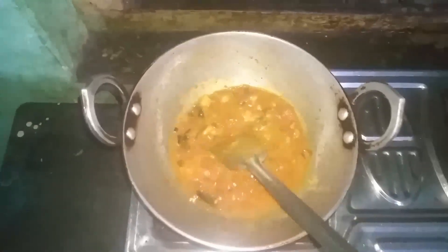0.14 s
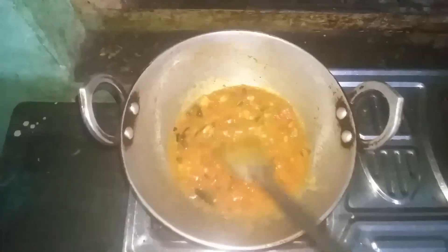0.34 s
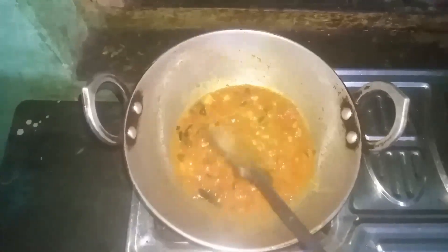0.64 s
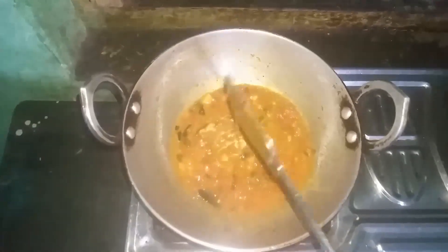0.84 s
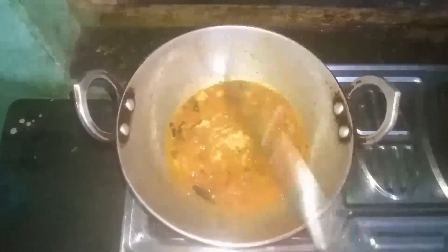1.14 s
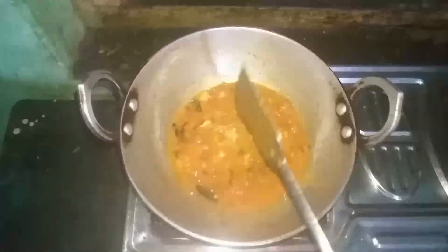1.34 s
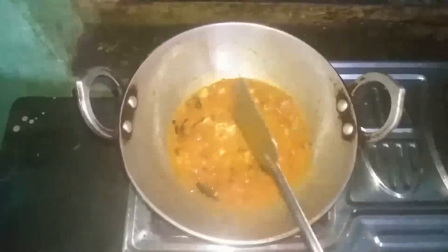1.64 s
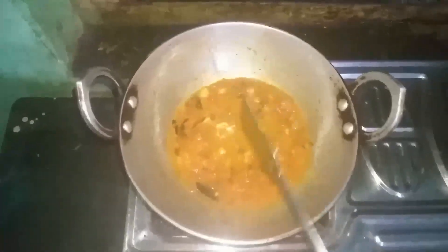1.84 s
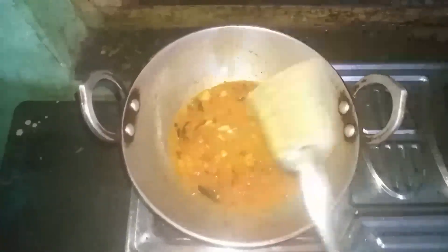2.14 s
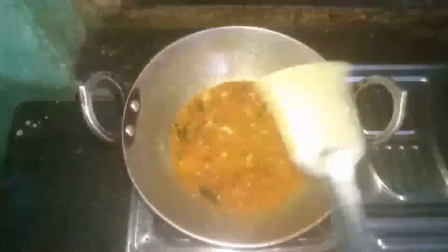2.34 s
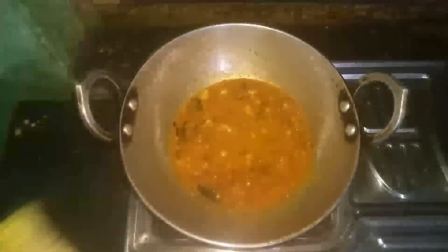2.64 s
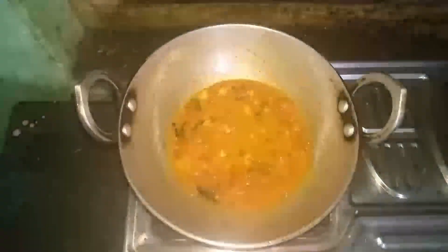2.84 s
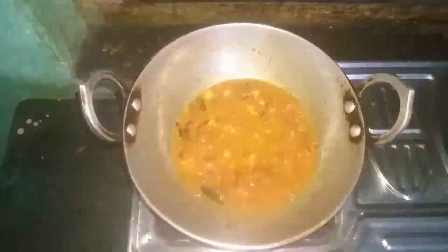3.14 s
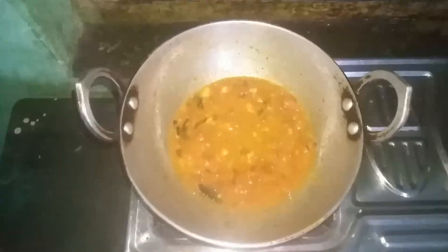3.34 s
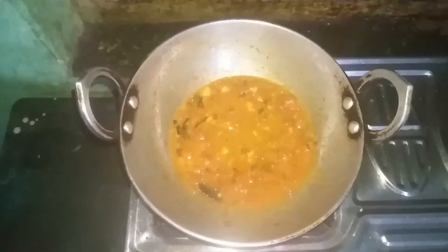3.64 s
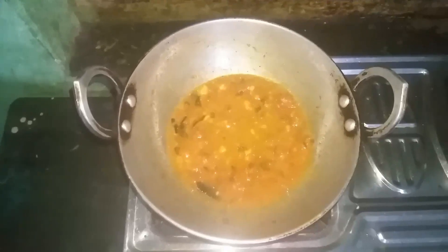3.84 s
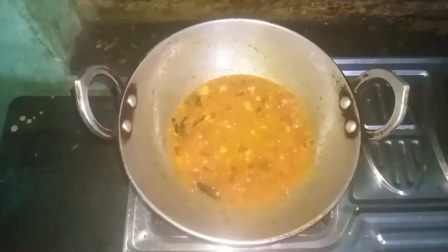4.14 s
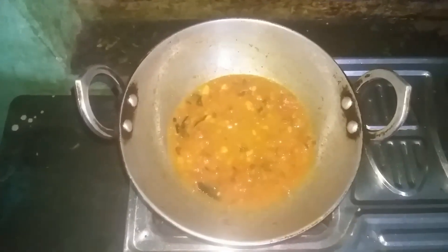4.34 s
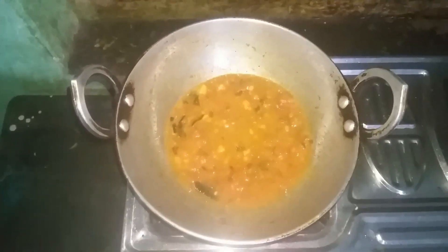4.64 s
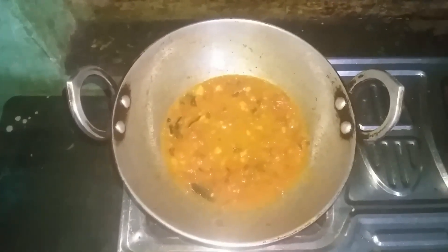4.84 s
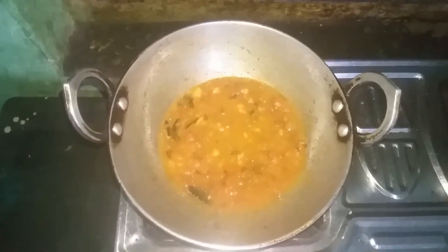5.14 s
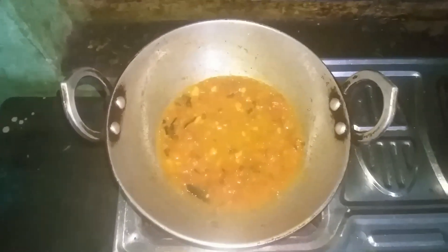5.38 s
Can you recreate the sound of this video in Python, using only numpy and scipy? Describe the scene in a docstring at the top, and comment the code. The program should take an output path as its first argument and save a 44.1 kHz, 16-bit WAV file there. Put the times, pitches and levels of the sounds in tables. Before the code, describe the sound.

Gravy sizzles and pops in a hot pan over a fan's hum, and a metal spatula is set down with a ringing clank.

```python
"""In a hard-walled kitchen, gravy simmers in a hot metal pan over the hum of a fan motor.
Tiny bubbles burst at the rim, each a damped resonator; together they sizzle, with bigger pops and spits.
At first a spatula scrapes the pan, its slips exciting the metal. Near the end it is put down on steel:
a touch, a loud clank, a short clatter and a ring, after which a gain control lowers the level a little.
Faint far-off squeaks and a soft rush come and go behind."""
import sys
import numpy as np
from scipy import signal
from scipy.fft import rfft, irfft, next_fast_len
from scipy.io import wavfile
from scipy.ndimage import uniform_filter1d, map_coordinates

SR = 44100
rng = np.random.default_rng(int(sys.argv[2]) if len(sys.argv) > 2 else 0)


def int16_out(signal):
    """Quantize to a 16-bit WAV file."""
    q = np.round(np.clip(np.atleast_2d(signal).T, -1, 1) * 32767)
    wavfile.write(sys.argv[1], SR, q.astype(np.int16))


N = 242991
TIME = np.arange(N) / SR

# Spectral shapes. Each row: frequency in Hz, relative gain in dB.
SIZZLE_SPECTRUM = [(600, -44), (1100, -39), (1400, -25.5), (1600, -13.5), (2000, -11.5), (2500, -5.5),
                   (3050, -0.5), (3350, -4.5), (3800, -1), (4900, -5.5), (6500, -9), (7900, -7.5),
                   (8900, -14), (10000, -34.5), (15500, -35.5)]   # bursting bubbles
SPRAY_SPECTRUM = [(7000, -26), (9500, -4), (11800, -1.5), (13500, -8), (15500, -8)]   # fine spray of steam
CLASH_SPECTRUM = [(60, -59), (130, -31), (340, -24), (480, -31), (1400, -28.5), (1850, -19), (2130, -12.5),
                  (2450, 4), (2800, -9), (3100, 1), (3500, -7), (4600, -5), (5650, -14.5), (7400, -8.5),
                  (8400, -13.5), (9800, -21.5), (15500, -14)]   # dense modes of thin steel
RUSH_SPECTRUM = [(300, -18), (600, -18.5), (720, -4), (880, 1), (1050, -0.5), (1300, -4.5), (1600, -1),
                 (2400, -42)]   # soft midrange rush
FAN_AIR_SPECTRUM = [(20, -17), (40, -10), (55, -2), (75, -11), (110, 2), (140, 0), (190, 0), (260, -1),
                    (335, 0.5), (390, -13), (600, -18), (1400, -26.5), (6000, -48)]   # air moved by the fan
PORT_DIFFERENCE = [(50, -22), (110, -44), (200, -57), (700, -52), (2500, -25), (4400, -40), (7000, -64),
                   (9500, -12.5), (15000, -37)]   # how differently two microphone ports hear the room
# The boil: stirring calms it, then the heat builds. Each row: time in seconds, vigour in dB.
BOIL_VIGOUR = [(0.1, 0), (0.4, -4), (0.85, -6.5), (1.4, -3.5), (2.05, 0.5), (2.75, -1), (3.55, 1.5),
               (4.6, 4), (5.1, 4.5), (5.4, 3.5)]
# Steam flares as gravy washes onto dry hot metal.
# Each row: centre in seconds, length in seconds, spray level in dB.
STEAM_FLARES = [(0.826, 0.04, -75), (1.535, 0.03, -74), (1.64, 0.16, -73), (2.467, 0.07, -69),
                (4.83, 0.05, -71), (5.4, 0.24, -73)]
# The biggest bubbles. Each row: time in seconds, relative peak level in dB, pitch in Hz.
BIG_BUBBLES = [(0.058, -27.5, 2580), (1.242, -34, 3020), (1.3922, -32, 3810), (1.6171, -27, 4100),
               (1.8453, -26, 2930), (2.39, -26, 3830), (2.4764, -27.5, 2960), (3.3918, -29, 3480),
               (3.4238, -28, 3400), (3.508, -27, 3230), (4.6512, -25, 4160)]
# Wet spits. Each row: centre in seconds, length in seconds, pitch in Hz, relative level in dB.
WET_SPITS = [(0.22, 0.01, 7300, -55), (0.538, 0.0096, 2900, -45), (2.038, 0.037, 3000, -44),
             (2.463, 0.016, 5200, -45), (2.733, 0.012, 6800, -52), (3.172, 0.015, 7200, -46),
             (3.246, 0.011, 2900, -44.5), (3.301, 0.011, 2980, -44), (5.196, 0.016, 7500, -47),
             (5.447, 0.014, 4900, -39.5)]
# Spatula impacts. Each row: start in seconds, relative level in dB, low-pass cutoff in Hz, echo in dB.
BLADE_TOUCHES = [(3.8858, -21.5, 12000, -7), (3.8892, -16.5, 11700, -1)]   # the blade touches first
LANDING_IMPACTS = [(4.0847, -4.5, 9000, 1), (4.0867, -4.5, 9150, -2), (4.0910, -5, 12800, -2.5),
                   (4.1050, -9, 7000, -4), (4.274, -8.5, 3580, -5), (4.2907, -11, 4500, -3),
                   (4.2943, -13, 5900, -6.5), (4.3006, -10.5, 5950, -2.5)]   # the spatula lands and rattles
# Quickly damped resonances. Each row: frequency in Hz, bandwidth in Hz, relative gain in dB.
BLADE_RESONANCES = [(2260, 115, 4.5), (2520, 300, -2.5), (2900, 160, 0), (4760, 110, -4.5),
                    (8130, 150, -8.5), (11550, 340, -19), (12700, 700, -22)]
STEEL_RESONANCES = [(2520, 108, 7), (3034, 237, 3.5), (3902, 41, 9), (4550, 150, 8), (4505, 130, 6),
                    (5020, 170, -4.5), (6090, 87, -2), (7000, 170, -7), (7340, 69, -7), (8280, 110, -2),
                    (8080, 110, -5)]
PAN_RESONANCES = [(1180, 160, -10), (1590, 63, -10), (1810, 22, -13.5), (2140, 56, 1), (2580, 43, 2)]
# Lasting modes of the steel. Each row: frequency in Hz, relative level in dB.
STEEL_MODES = [(2456, 0), (2507, -4), (2581, -16), (2771, -17), (3086, -9), (3177, -17), (3221, -7),
               (3995, 0), (4034, 0), (4248, -14), (4388, -2.5), (4660, -4), (7267, -22), (7476, -14),
               (8490, -12)]
# Far-off squeaks. Each row: start in seconds, length in seconds, pitch in Hz, relative level in dB.
FAR_SQUEAKS = [(.69, .11, 1760, -69), (0.887, 0.11, 1680, -66), (1.087, 0.16, 1202, -62),
               (1.36, 0.11, 1627, -57), (1.445, 0.14, 1160, -65)]
# Swells of the rush. Each row: start in seconds, start of the fade in seconds, relative level in dB.
RUSH_SWELLS = [(3.448, 4.05, -73.5), (4.29, 4.805, -65), (5.028, 5.5, -66.5)]
# Reverberation of the kitchen. Each row: frequency in Hz, time to decay by 60 dB in seconds.
KITCHEN_T60 = [(150, 0.99), (1000, 0.66), (3000, 0.47), (7000, 0.53), (12000, 0.34)]


def sizzle(crackle_db=-48, fizz_db=-56.5, spray_db=-81, flare_fizz_db=17.5, split_hz=5500):
    """Superposition: countless bursts merge into crackle, fizz and spray, all following the boil."""
    vigour = boil_vigour()
    flare = sum(from_db(db) * swell_at(s, length) for s, length, db in STEAM_FLARES)
    fizz_gain = from_db(fizz_db + 0.73 * vigour + 1.05 * drift(14))
    fizz_gain = np.hypot(fizz_gain, from_db(flare_fizz_db) * flare)   # powers add
    spray_gain = np.hypot(from_db(spray_db + vigour + 2.5 * drift(14)), flare)
    rim = bubble_swarm(per_s=4500, size_db=4, size_cap=4.6, clump_db=2.5, damping=0.21)
    rim = with_room(coloured(rim, SIZZLE_SPECTRUM), room_db=-2)
    crackle = from_db(crackle_db + vigour) * unit_rms(butterworth(rim, split_hz, "low", order=5))
    fizz = fizz_gain * unit_rms(butterworth(rim, split_hz, "high", order=5))
    steam = bubble_swarm(per_s=16000, size_db=6, size_cap=3.9, clump_db=0.5, damping=0.6)
    spray = spray_gain * unit_rms(coloured(steam, SPRAY_SPECTRUM))
    return crackle + fizz + with_room(spray, room_db=1)


def bubble_swarm(per_s, size_db, size_cap, clump_db, damping):
    """A Poisson process: bubbles burst at random, few big and many small, each ringing briefly."""
    pitches = np.geomspace(1300, 14000, 14)
    bursting = rng.random(N) < per_s * from_db(clump_db * drift(30)) / SR
    sizes = from_db(size_db * np.minimum(rng.exponential(1, N), size_cap))
    clicks = bursting * sizes * rng.choice([-1, 1], N)
    pitch_index = rng.integers(0, len(pitches), N)
    rings = (resonance(clicks * (pitch_index == k), hz, damping * hz) for k, hz in enumerate(pitches))
    return unit_rms(sum(rings))


def pops(damping=0.42, pop_delay_s=0.001185, collapse_s=0.0013, collapse_db=-5):
    """Impulse excitation: a big bubble's film tears with a snap, then the hollow collapses."""
    out = np.zeros(N)
    snap = coloured(signal.unit_impulse(SR // 20), SIZZLE_SPECTRUM)
    for s, db, hz in BIG_BUBBLES:
        pop = resonance(snap, hz, damping * hz)
        pop = from_db(db + 0.5) * pop / np.abs(pop).max()
        start = s + pop_delay_s   # a short delay from each listed time to its pop
        add(out, start, pop)
        add(out, start + collapse_s * rng.uniform(0.5, 2.5), from_db(collapse_db) * pop)
    return with_room(out, room_db=-4)


def spits(damping=0.25):
    """Flash boiling: a patch of gravy turns to steam in like-sized bubbles sounding near one pitch."""
    swarm = bubble_swarm(per_s=12000, size_db=2.8, size_cap=4.5, clump_db=1, damping=0.8)
    out = np.zeros(N)
    for s, length, hz, db in WET_SPITS:
        out += from_db(db - 1) * narrow_band(swarm, hz, damping * hz) * swell_at(s, length)
    return with_room(out, room_db=-5)


def spatula_down():
    """Impacts excite free vibration: a light touch of the blade, then the clank, rattle and ring."""
    touch = impacts(BLADE_TOUCHES, BLADE_RESONANCES, clash_db=-3.5, clash_s=0.0073)
    clank = impacts(LANDING_IMPACTS, STEEL_RESONANCES, clash_db=3, clash_s=0.0058)
    return touch + clank + steel_ring()


def impacts(contacts, resonances, clash_db, clash_s, shade_hz=8000):
    """Each blow excites broad resonances and a clash of dense modes; softer contact gives less treble."""
    direct, to_walls, t = np.zeros(N), np.zeros(N), TIME[:SR // 4]
    tone = metal_body(signal.unit_impulse(len(t)), resonances)
    tone = tone / np.abs(tone).max()
    for s, db, cutoff_hz, echo_db in contacts:
        clash = coloured(rng.standard_normal(len(t)) * np.exp(-t / clash_s), CLASH_SPECTRUM)
        clash = from_db(clash_db) * clash * np.linalg.norm(tone) / np.linalg.norm(clash)
        blow = from_db(db) * butterworth(tone + clash, cutoff_hz, "low")
        add(direct, s, blow)
        add(to_walls, s, from_db(echo_db) * blow)
    # the spatula lands off to one side, so its top treble arrives mostly by way of the walls
    return butterworth(direct, shade_hz, "low") + kitchen(to_walls)


def steel_ring(level_db=-29, lowest_mode_t60_s=0.38, treble_loss=0.31, waver_db=2.5):
    """Modal decay: lasting modes store the energy of each impact; the high ones lose it sooner."""
    energy, out = np.zeros(N), np.zeros(N)
    for s, db, *_ in LANDING_IMPACTS:
        energy[int(s * SR)] += from_db(db) ** 2
    for hz, db in STEEL_MODES:
        t60 = lowest_mode_t60_s * (STEEL_MODES[0][0] / hz) ** treble_loss
        retained = np.exp(-2 * np.log(1000) / (t60 * SR))
        stored = signal.lfilter([1], [1, -retained], energy + 1e-18)
        gain = from_db(level_db + db + waver_db * drift(43))   # the rocking spatula makes it waver
        out += gain * np.sqrt(stored) * np.sin(2 * np.pi * (hz * TIME + rng.random()))
    return out


def scraping(slips_per_s=900, ring_db=-50, hold_s=0.14, fade_db_per_s=46):
    """Stick-slip friction: the blade rings the pan and rocks it on its stand, then eases off."""
    slips = (rng.random(N) < slips_per_s / SR) * rng.standard_normal(N)
    slips = with_room(slips, room_db=0)
    ring = unit_rms(metal_body(slips, PAN_RESONANCES))
    grit = from_db(-9) * unit_rms(butterworth(slips, (1000, 3200), "band", order=4))
    rumble = from_db(-7) * unit_rms(butterworth(slips, (75, 430), "band", order=4))
    effort = from_db(ring_db - fade_db_per_s * np.maximum(TIME - hold_s, 0))
    return effort * (ring + grit + rumble)


def squeaks(waver=0.0133, rasp=0.42, rasp_width_hz=130):
    """Frequency modulation makes faint far-off tones unsteady; narrow-band noise makes them raspy."""
    out = np.zeros(N)
    pitch_ratio = 1 + waver * drift(120)
    friction = rng.standard_normal(N)
    for s, length, hz, db in FAR_SQUEAKS:
        swell = np.sin(np.pi * np.clip((TIME - s) / length, 0, 1))
        tone = np.sin(2 * np.pi * np.cumsum(hz * pitch_ratio) / SR)
        out += from_db(db) * swell * (tone / 2 + rasp * narrow_band(friction, hz, rasp_width_hz))
    return with_room(out, room_db=-2)


def fan(hum_hz=159.1, waver_hz=0.34, hum_db=-51, flutter_db=0.5, air_db=-63):
    """Tonal and broadband noise: the motor gives one clean tone, the moving air a low roar."""
    phase = 2 * np.pi * np.cumsum(hum_hz + waver_hz * drift(5.36)) / SR
    hum = np.sqrt(2) * np.sin(phase) * from_db(hum_db + flutter_db * drift(14))
    air = from_db(air_db) * unit_rms(coloured(rng.standard_normal(N), FAN_AIR_SPECTRUM))
    return hum + air


def soft_rush(bed_db=-76, ramp_s=0.2):
    """Power addition: swells of midrange noise rise over a faint bed that follows the boil."""
    swells = sum(from_db(db + 3) * np.interp(TIME, [on, on + ramp_s, off, off + ramp_s], [0, 1, 1, 0])
                 for on, off, db in RUSH_SWELLS)
    bed = from_db(bed_db + boil_vigour())
    return np.hypot(bed, swells) * unit_rms(coloured(rng.standard_normal(N), RUSH_SPECTRUM))


def kitchen(x, build_s=0.005):
    """Diffuse reverberation of unit gain; the treble dies first."""
    t, edges = TIME[:SR * 3 // 4], np.geomspace(40, 18000, 12)
    tail = 0
    for low, high in zip(edges, edges[1:]):
        t60 = at_hz(KITCHEN_T60, np.sqrt(low * high))
        band = butterworth(rng.standard_normal(len(t)), [low, high], "band", order=4)
        tail = tail + band * np.exp(-np.log(1000) * t / t60)
    tail = tail * (1 - np.exp(-(t / build_s) ** 2))   # the first reflections take a moment
    return signal.fftconvolve(x, tail / np.linalg.norm(tail))[:N]


def with_room(x, room_db):
    """Direct sound plus the reverberant field."""
    return x + from_db(room_db) * kitchen(x)


def gain_control(x, threshold_db=-20, duck_db=-2.5, hold_s=0.83, glide_s=0.5):
    """Automatic gain control: after a loud sound the gain glides down, holds, and glides back."""
    loud = uniform_filter1d(x[0] ** 2, size=SR // 100) > from_db(threshold_db) ** 2
    since_loud = TIME - np.maximum.accumulate(np.where(loud, TIME, -np.inf))
    held_s = np.cumsum(since_loud < hold_s) / SR
    share = (held_s - np.interp(TIME - glide_s, TIME, held_s)) / glide_s
    return x * from_db(duck_db * share)


def resonance(x, hz, width):
    """A damped two-pole resonator with peak gain 1."""
    r = np.exp(-np.pi * width / SR)
    feedback = [1, -2 * r * np.cos(2 * np.pi * hz / SR), r * r]
    return signal.lfilter(np.array([1, 0, -1]) * (1 - r * r) / 2, feedback, x + 1e-18)


def narrow_band(x, hz, width):
    """Two resonators in series, scaled to rms 1."""
    return unit_rms(resonance(resonance(x, hz, width), hz, width))


def metal_body(x, peaks):
    """Modal superposition: resonators in parallel, with alternating signs."""
    return sum((-1) ** k * from_db(db) * resonance(x, hz, width)
               for k, (hz, width, db) in enumerate(peaks))


def coloured(x, spectrum):
    """Causal (minimum-phase) filter with the given spectrum."""
    size = 2 * next_fast_len((len(x) + SR // 10) // 2, real=True)
    gain = from_db(at_hz(spectrum, np.arange(size // 2 + 1) * SR / size))
    cepstrum = irfft(np.log(gain), size)
    cepstrum[1:size // 2] *= 2
    cepstrum[size // 2 + 1:] = 0
    return irfft(rfft(x, size) * np.exp(rfft(cepstrum)), size)[:len(x)]


def butterworth(x, hz, kind, order=2):
    """Filter with a maximally flat passband."""
    return signal.sosfilt(signal.butter(order, hz, kind, fs=SR, output="sos"), x + 1e-18)


def drift(rate):
    """Smooth random modulation of rms 1, through rate knots a second."""
    knots = rng.standard_normal(2000)
    return unit_rms(map_coordinates(knots, [TIME * rate], order=2, mode="mirror"))


def boil_vigour():
    """The vigour of the boil in dB at every sample."""
    return np.interp(TIME, *np.transpose(BOIL_VIGOUR))


def swell_at(s, length):
    """A Gaussian envelope of height 1 around time s."""
    return np.exp(-2 * ((TIME - s) / length) ** 2)


def at_hz(points, hz):
    """Interpolate a table on a log-frequency axis."""
    frequencies, values = np.transpose(points)
    return np.interp(np.log(hz + 1), np.log(frequencies), values)


def add(out, s, sound):
    """Superpose a short sound at time s."""
    at = int(s * SR)
    out[at:at + len(sound)] += sound[:N - at]


def from_db(db):
    """Decibels to amplitude ratio."""
    return 10 ** (np.asarray(db) / 20)


def unit_rms(x):
    """Scale to rms 1."""
    return x / np.sqrt(np.mean(x ** 2) + 1e-20)


def scene(port_hz=1880, port_width_hz=750, port_db=-12):
    """Mid-side stereo: two microphone ports hear nearly the same; the left is stronger in one band."""
    mid = sizzle() + pops() + spits() + spatula_down() + scraping() + squeaks() + fan() + soft_rush()
    # forwards and backwards through one resonance: a level difference with no lag
    forwards = resonance(mid, port_hz, port_width_hz)
    port_band = resonance(forwards[::-1], port_hz, port_width_hz)[::-1]
    side = from_db(port_db) * port_band + coloured(kitchen(mid), PORT_DIFFERENCE)
    return np.array([mid + side, mid - side])


def record(dry):
    """Gain control acts, soft saturation rounds the peaks and a steep low-pass cuts the top."""
    level = gain_control(dry)
    rounded = level / (1 + level ** 6) ** (1 / 6)
    cutoff_hz = 15700
    return signal.sosfilt(signal.ellip(12, 0.1, 100, cutoff_hz, fs=SR, output="sos"), rounded)


dry = scene()
out = record(dry)
int16_out(out)
```